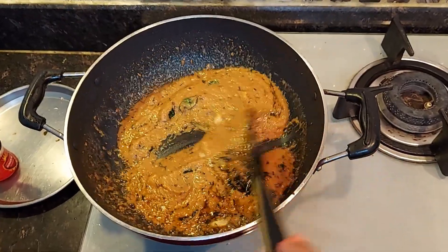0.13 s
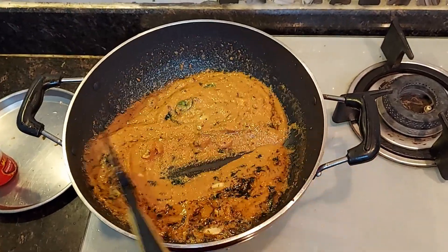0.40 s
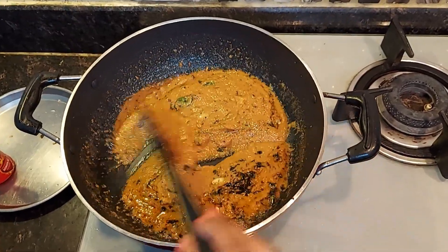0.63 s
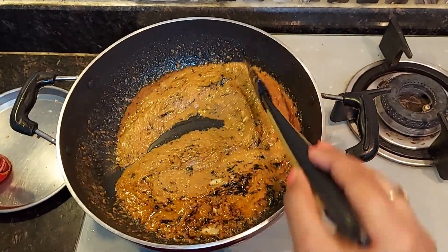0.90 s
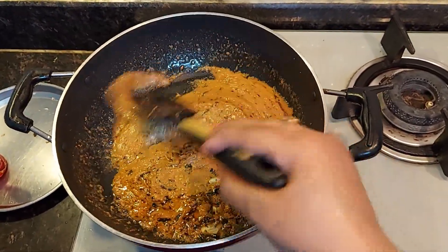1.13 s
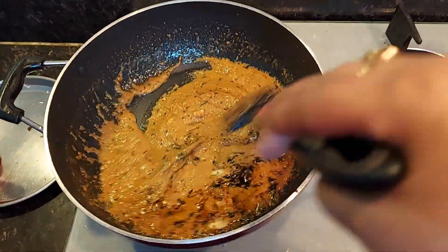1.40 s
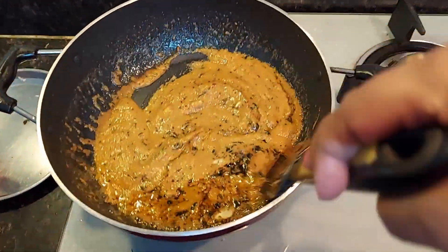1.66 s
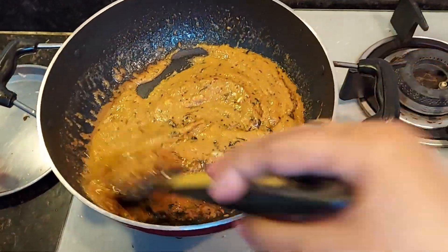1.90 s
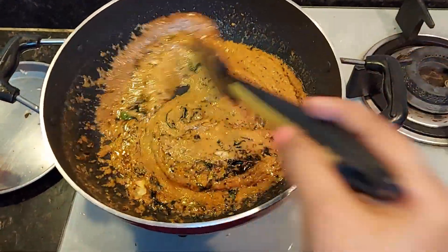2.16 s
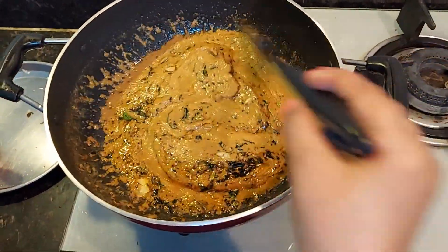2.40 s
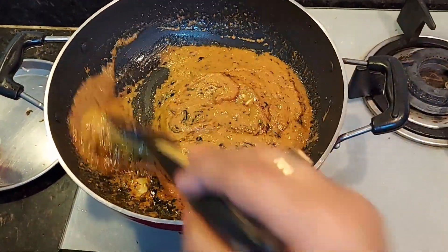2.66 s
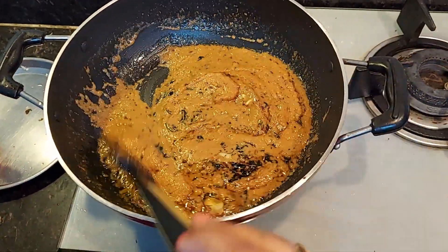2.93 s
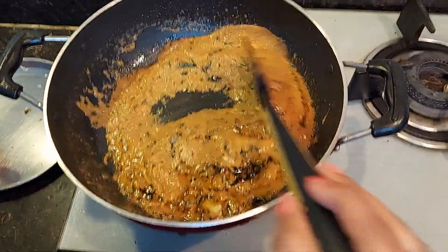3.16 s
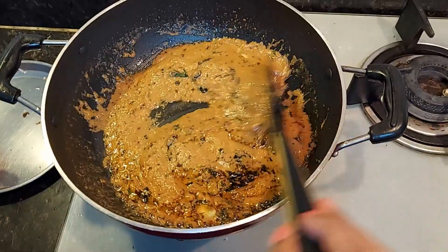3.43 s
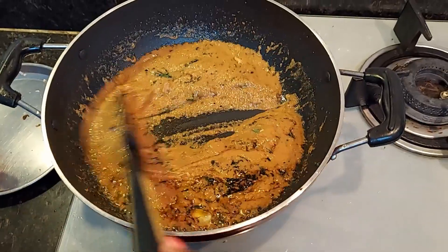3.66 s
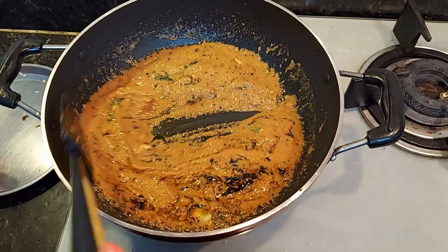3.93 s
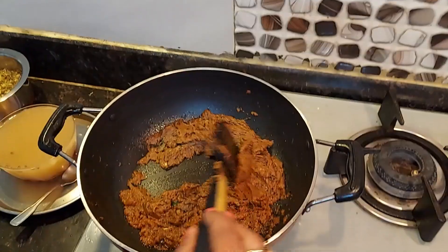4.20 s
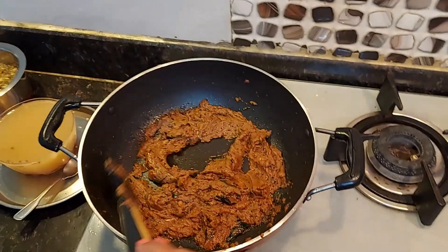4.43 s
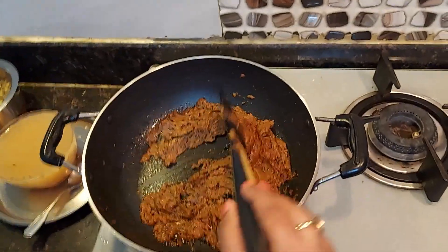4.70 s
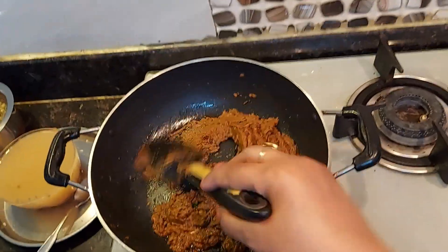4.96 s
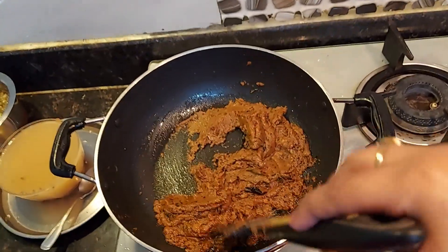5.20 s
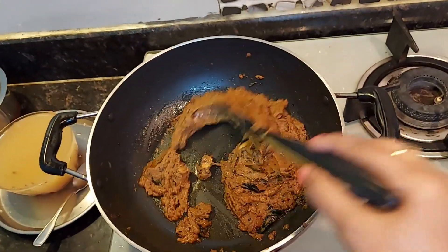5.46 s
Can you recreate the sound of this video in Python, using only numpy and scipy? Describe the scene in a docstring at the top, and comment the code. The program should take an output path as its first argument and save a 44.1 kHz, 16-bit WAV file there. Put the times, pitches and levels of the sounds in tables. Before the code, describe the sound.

In a home kitchen, heard from very near, paste fries with a steady dense hiss of tiny bursting bubbles, bright snaps mostly toward the left, and bubbly blips around one second. Stirring adds low rubbing and irregular woody-metallic pan bumps, weightier on the right. A brief silent edit follows, then fainter, drier frying with continued scraping and a strong cluster of knocks near five seconds.

```python
"""Kitchen, close over a deep pan on a gas ring: thick spice paste fries in oil while a spatula stirs it.
Two unlike microphone ports hear steam bubbles as dense filtered clicks, spits as short bright noise,
fat bubbles and bits of scrape as rough rising blips, mid-sized bubbles as brief rings of the bowl. The
blade drags as lumpy low noise and bumps the pan into a bank of decaying modes. After a short silent cut
the paste is drier, the sizzle softer and the microphones sit elsewhere."""
import sys
import numpy as np
from scipy import signal
from scipy.fft import rfft, irfft
from scipy.io import wavfile

SR = 44100
rng = np.random.default_rng(int(sys.argv[2]) if len(sys.argv) > 2 else 0)


def digitize_waveform(pressure):
    """Quantize a signal to 16-bit integers and store it at the path in sys.argv[1].

    Rows of a 2-D input are taken as channels; values are limited to [-1, 1].
    """
    field = np.atleast_2d(pressure).T
    bounded = np.clip(field, -1, 1)
    quanta = np.round(bounded * 32767).astype(np.int16)
    wavfile.write(sys.argv[1], SR, quanta)


def invert_db(level):
    """Linear amplitude ratio for a level in decibels (20 dB per decade), elementwise."""
    return 10 ** (np.asarray(level, dtype=float) / 20)


N = 246078
CUT_S = 4.18
PORT_LAG_S = 0.0003   # right port after left


def rms_one(x):
    """Scale to unit power."""
    return x / np.sqrt(np.mean(x ** 2) + 1e-20)


def in_time(rows):
    """Columns of a table as curves over all samples."""
    s, *columns = np.transpose(rows)
    return [np.interp(np.arange(N) / SR, s, c) for c in columns]


def drift(rate_per_s):
    """Slow chance with spread 1: twice-smoothed noise made at 1/40 of the sample rate."""
    r = np.exp(-80 * np.pi * rate_per_s / SR)
    noise = rng.standard_normal(N // 40 + 2002)
    slow = rms_one(signal.lfilter([1], [1, -2 * r, r * r], noise)[2000:])
    return np.interp(np.arange(N) / 40, np.arange(len(slow)), slow)


def colour(x, points, size=4096):
    """Causal (minimum phase) filter with the given spectrum."""
    hz, level_db = np.transpose(points)
    grid_hz = np.maximum(np.arange(size // 2 + 1), 0.1) * SR / size
    log_gain = np.log(invert_db(np.interp(np.log(grid_hz), np.log(hz), level_db)))
    cepstrum = irfft(log_gain)
    cepstrum[1:size // 2] *= 2
    cepstrum[size // 2 + 1:] = 0
    impulse = irfft(np.exp(rfft(cepstrum)))
    return signal.oaconvolve(x, impulse)[:N]


def band(x, low_hz, high_hz):
    """Fourth-order band-pass."""
    return signal.sosfilt(signal.butter(4, [low_hz, high_hz], "band", fs=SR, output="sos"), x)


def one_side(x, edge_hz, side):
    """Second-order low-pass or high-pass."""
    return signal.sosfilt(signal.butter(2, edge_hz, side, fs=SR, output="sos"), x)


def lean(left_over_right_db):
    """Gains of the two ports for a level difference."""
    return invert_db(left_over_right_db * np.array([[0.5], [-0.5]]))


def delayed(x, lag_s):
    """Later by lag_s, same length."""
    return np.r_[np.zeros(round(lag_s * SR)), x][:N]


def add_event(out, start_s, pair):
    """Add a two-port event, the right port late by the lag."""
    i, lag, size = round(start_s * SR), round(PORT_LAG_S * SR), pair.shape[1]
    out[0, i:i + size] += pair[0]
    out[1, i + lag:i + lag + size] += pair[1]


# spectrum of the kitchen air: pitch_hz, level_db_per_hz (relative)
AIR_SPECTRUM = [(20, -28.5), (45, -5), (90, 2.5), (200, -14), (500, -15), (1000, -15.5), (2000, -35)]


def kitchen_air():
    """A dull steady murmur of flame and room: shaped noise, unrelated at the two ports."""
    level_db = -60.5
    return invert_db(level_db) * np.array([rms_one(colour(n, AIR_SPECTRUM)) for n in rng.standard_normal((2, N))])


# blade dragging, before and after the cut: time_s, level_db, scrape_gain_db (above 250 Hz)
BLADE_DRAG = [
    [(0.0, -56.5, 0), (0.3, -51.5, -4), (0.45, -56, -1), (0.8, -55.5, -1), (1.07, -64, 2), (1.24, -53, 0),
     (1.42, -58.5, -7), (1.6, -58.5, 0), (1.9, -58.5, -2), (2.15, -56, -1), (2.45, -55.5, -8),
     (2.74, -57, -6), (3.15, -57, 2.5), (3.4, -57, -3), (3.65, -50.5, -14), (3.87, -60.5, -8),
     (4.12, -52.5, -7)],
    [(4.26, -65, 9), (4.4, -56, -1), (4.55, -59, 2), (4.722, -53.5, -5), (4.9, -55, 1), (5.076, -56.5, 2),
     (5.25, -58, 1.5), (5.4, -57, 4), (5.58, -59, 5)],
]
# spectrum of the drag: pitch_hz, level_db_per_hz (relative)
DRAG_SPECTRUM = [(25, -58), (45, -8.5), (72, -2.5), (86, -4.5), (99, 5.5), (113, -8.5), (128, -6),
                 (150, -4), (200, -15), (280, -9), (450, -14.5), (600, -24.5), (900, -25.5)]


def blade_drag():
    """The blade shakes the pan in uneven lumps and scrapes unevenly too; partly unlike at the ports."""
    lump_db, lump_per_s = 2.2, 19.0
    scrape_lump_db, scrape_lump_per_s = 2.4, 10.3
    unlike_db = -4   # each port's own noise over the shared noise
    level_db, scrape_db = in_time(np.vstack(BLADE_DRAG))
    shared, left, right = (rms_one(colour(n, DRAG_SPECTRUM)) for n in rng.standard_normal((3, N)))
    shake = shared + invert_db(unlike_db) * np.array([left, right])
    scrape = one_side(shake, 250, "high")
    level = invert_db(level_db + lump_db * drift(lump_per_s))
    scrape_gain = invert_db(scrape_db + scrape_lump_db * drift(scrape_lump_per_s))
    return level * (shake + (scrape_gain - 1) * scrape)


# blade bumps: start_s, boom_db, second_modes_db, upper_modes_db, press_ms (8 ms at least)
BLADE_BUMPS = [(0.101, -50, -44, -42, 20), (0.117, -34.5, -37, -43, 33), (0.161, -48, -35, -44.5, 19),
               (0.53, -39, -59, -66, 31), (0.655, -32.5, -32.5, -44, 41), (0.729, -38, -40.5, -49, 25),
               (1.042, -23, -26, -41.5, 61), (1.045, -60, -35, -27.5, 7), (1.084, -60, -41, -43, 20),
               (1.108, -60, -47, -34.5, 10), (1.118, -29, -31.5, -42, 34), (1.165, -42, -31.5, -49, 34),
               (1.2, -51, -40, -53, 28), (1.31, -42, -70, -63, 16), (1.419, -43, -73, -72, 43),
               (1.658, -43, -40.5, -48.5, 103), (1.711, -45, -32, -55, 49), (1.751, -48, -31, -55, 32),
               (1.843, -31.5, -41.5, -49, 23), (2.55, -33, -35.5, -58, 24), (2.612, -40, -47, -70, 21),
               (2.659, -42, -50, -62, 18), (2.722, -45.5, -41.5, -63, 40), (2.921, -39, -23, -34.5, 34),
               (2.935, -60, -50, -50, 18), (2.946, -27.5, -25, -47, 34), (2.961, -60, -50, -36, 6.9),
               (2.979, -35, -29.5, -45.5, 38), (3.031, -41, -32.5, -53, 22), (3.08, -46, -42, -58, 20),
               (3.33, -48, -53, -64, 11), (3.51, -32.5, -32.5, -41, 33), (3.62, -51, -36.5, -45, 20),
               (3.674, -59, -52, -44, 9.3), (3.923, -45, -57, -53, 160), (4.013, -42, -35, -34.5, 7.9),
               (4.022, -60, -45, -38, 7), (4.034, -55, -36, -51, 74), (4.228, -37.5, -80, -54.5, 98),
               (4.334, -45, -46.5, -69, 50), (4.603, -43, -41, -56, 100), (4.662, -40, -51, -58, 29),
               (4.756, -37, -36.5, -44, 30), (4.804, -38, -50, -64, 39), (4.865, -40, -60, -60, 86),
               (4.938, -28, -26.5, -41.5, 25), (4.966, -21, -22, -46, 28), (5.011, -30, -31, -45, 29),
               (5.064, -50, -36, -58, 43), (5.19, -44.5, -60, -66, 140), (5.314, -37, -45, -46.5, 20),
               (5.356, -38, -27, -50, 55), (5.394, -53, -32.5, -55, 22), (5.429, -60, -42, -58, 41),
               (5.449, -54, -35.5, -61, 114)]
# bumps where the blade's hard edge meets bare metal: start_s, top_modes_db
HARD_EDGE = [(2.92, -43), (2.935, -40), (2.946, -43)]
# where the blade lands sets which modes answer most: start_s, second_centre_hz, upper_centre_hz
BLADE_LANDINGS = [(0.117, 162, 280), (0.655, 196, 510), (1.044, 189, 806), (1.084, 190, 780),
                  (1.108, 190, 770), (1.118, 174, 480), (1.166, 163, 350), (1.71, 149, 300),
                  (1.751, 150, 300), (2.92, 192, 382), (2.946, 180, 370), (2.98, 161, 350),
                  (2.963, 170, 815), (3.511, 202, 310), (3.675, 170, 805), (4.014, 191, 770),
                  (4.023, 189, 700), (4.034, 191, 550), (4.755, 191, 456), (4.938, 208, 550),
                  (4.965, 191, 480), (5.011, 190, 480), (5.065, 190, 300), (5.356, 150, 300),
                  (5.395, 150, 300), (5.43, 160, 300), (5.45, 240, 298)]
# modes of the pan on its trivet: pitch_hz, level_db (in its family), t60_s
PAN_MODES = [(91.4, -4, 0.051), (151.8, -6.5, 0.29), (191, -9, 0.18), (236.8, -14, 0.11), (265.3, -6, 0.21),
             (316, -11, 0.041), (356.7, -7, 0.077), (456, -10, 0.11), (527.7, -10.5, 0.29),
             (633, -13.5, 0.089), (742, -10.5, 0.1), (831, -8, 0.025), (950, -12, 0.025), (1135, -3, 0.07),
             (1237, -9, 0.05), (2130, 3, .05), (2480, 0, .025)]
# borders between boom, second, upper and top modes: pitch_hz
FAMILY_BORDERS = [120, 247, 1050]
# motion of each family: swell_share_of_press, droop_over_press_db, chatter_db
FAMILY_MOTION = [(0.9, -0.5, 0.3), (0.6, -8.5, -1.4), (0.22, -7, 3.5), (0.15, -7.5, 6)]


def blade_bumps(size=9000, slip_count=31):
    """Modes swell while the blade presses, then die in the paste; upper modes answer sooner and chatter."""
    landing_gain_db, landing_db_per_octave = 3.5, (0, 19.5, 9)   # slopes: boom, second, upper
    slip_s, strength_share = 0.0078, 0.5   # strength: one chance draw per mode and bump
    detune_share, dry_boom_rise_share = 0.023, 0.059   # less paste weighs on the pan after the cut
    droop_curve, port_phase_rad = 0.82, 1.03
    t = np.arange(size) / SR
    slip_times = np.arange(slip_count) * slip_s
    out = np.zeros((2, N + size))
    draws = rng.standard_normal((len(BLADE_BUMPS), len(PAN_MODES), 4 + slip_count))
    for (start_s, *family_db, press_ms), draw in zip(BLADE_BUMPS, draws):
        family_db += [db for at, db in HARD_EDGE if abs(at - start_s) < 0.004]
        centres = [(None, *hz, None) for at, *hz in BLADE_LANDINGS if abs(at - start_s) < 0.006]
        press_s = max(press_ms, 8) / 1000
        released_s = np.maximum(t - press_s, 0)
        pressed_share = np.minimum(t / press_s, 1)
        i = round(start_s * SR)
        for (hz, level_db, t60_s), (phase, detune, strength, apart, *slips) in zip(PAN_MODES, draw):
            family = np.searchsorted(FAMILY_BORDERS, hz)
            if family == len(family_db):   # no hard edge: top modes stay silent
                break
            swell_share, droop_db, chatter_db = FAMILY_MOTION[family]
            if centres and centres[0][family]:
                octaves = abs(np.log2(hz / centres[0][family]))
                level_db = level_db + landing_gain_db - landing_db_per_octave[family] * octaves
            swell_s = max(swell_share, 0.02) * press_s
            shape = np.sin(np.pi / 2 * np.minimum(t / swell_s, 1)) ** 0.44
            shape *= invert_db(droop_db * pressed_share ** droop_curve - 60 * released_s / t60_s)
            shape *= invert_db(chatter_db * (strength_share * strength + np.interp(t, slip_times, slips)))
            dry_boom = family == 0 and start_s > CUT_S
            pitch_hz = hz * (1 + detune_share * detune + dry_boom_rise_share * dry_boom)
            port_phase = port_phase_rad * (family > 1) * apart * np.array([[0], [1]])
            tone = np.sin(2 * np.pi * pitch_hz * t + 4 * phase + port_phase)
            out[:, i:i + size] += invert_db(family_db[family] + level_db) * shape * tone
    return out[:, :N]


# short rough blips near 1-2.5 kHz, fat bubbles and bits of scrape: start_s, level_db, pitch_hz
ROUGH_BLIPS = [(0.3398, -31, 1310), (0.4944, -50, 1190), (0.8225, -36, 2000), (0.8805, -36, 2040),
               (0.898, -30.5, 2000), (0.9263, -29, 1880), (0.9931, -36, 2120), (1.129, -37, 1940),
               (1.181, -33, 2160), (1.251, -29, 2140), (1.274, -31, 2190), (1.286, -29, 2120),
               (1.303, -35, 2140), (1.433, -36, 2000), (1.5795, -33, 2100), (2.1051, -49, 1190),
               (3.677, -41, 2000), (4.3675, -43, 2430), (4.5095, -44, 2020), (4.574, -39.5, 1710),
               (5.01, -42, 1260), (5.022, -46, 2040)]


def rough_blips(size=700):
    """Fat bubbles and bits of scrape: a few milliseconds of tone, rough and slightly rising."""
    pan_db, pan_spread_db = -7, -2.5   # left over right
    attack_s, decay_s, trim_db = 0.00048, 0.006, -3.0
    t = np.arange(size) / SR
    out = np.zeros((2, N + 2 * size))
    draws = rng.standard_normal((len(ROUGH_BLIPS), size + 1))
    for (start_s, level_db, hz), (side, *noise) in zip(ROUGH_BLIPS, draws):
        tone = np.sin(2 * np.pi * hz * t * (0.96 + 8.4 * t))
        rough = 0.37 * rms_one(band(noise, 0.25 * hz, 1.53 * hz))
        shape = np.minimum(t / attack_s, 1) * np.exp(-(t / decay_s) ** 2)
        blip = invert_db(level_db + trim_db) * (tone + rough) * shape
        add_event(out, start_s, blip * lean(pan_db + pan_spread_db * side))
    return out[:, :N]


# resonances of the pan's bowl: pitch_hz, level_db (relative), t60_s
BOWL_MODES = [(860, -8.5, 0.041), (1130, -5.5, .04), (1296, -7, 0.031), (1480, -8, .025),
              (1790, -2.5, 0.022), (2160, -5, 0.042), (2320, -7, 0.031), (2540, -0.5, 0.041),
              (3000, -1, 0.029), (3660, -1.5, 0.011), (3940, -4, 0.016), (4110, -11, 0.019),
              (4870, 0, .012)]


def crackle():
    """Mid-sized bubbles burst unevenly; each sets one resonance of the bowl ringing briefly."""
    base_per_s, clump_db, clump_per_s = 600, 4, 25
    spread_db, spread_cap = 4, 2.6
    over_treble_db, pan_db = -10.5, -3
    treble_db, lower_db, _ = in_time(np.vstack(SIZZLE_VIGOUR))
    born = rng.random(N) < base_per_s * invert_db(clump_db * drift(clump_per_s)) / SR
    sizes = invert_db(spread_db * np.minimum(rng.exponential(1, N), spread_cap))
    clicks = born * sizes * rng.choice([-1, 1], N)
    dealt = rng.integers(0, len(BOWL_MODES), N)
    rings = np.zeros(N)
    for k, (hz, level_db, t60_s) in enumerate(BOWL_MODES):
        r, w = invert_db(-60 / (t60_s * SR)), 2 * np.pi * hz / SR
        mine = clicks * (dealt == k) + 1e-18
        rings += invert_db(level_db) * signal.lfilter([0, np.sin(w)], [1, -2 * r * np.cos(w), r * r], mine)
    level_db = treble_db + lower_db - lower_db.mean() + over_treble_db
    heard = invert_db(level_db) * rms_one(rings)
    return np.array([heard, delayed(heard, PORT_LAG_S)]) * lean(pan_db)


def small_spits(count=90):
    """Spits at evenly random moments; their loudness follows the sizzle's level. Rows as in SET_SPITS."""
    over_treble_db, spread_db, low_hz, high_hz = 3.5, 2.5, 2300, 16000
    pan_db, pan_spread_db = 16.5, 6.4   # left over right
    when, size, pitch = rng.random((count, 3)).T
    treble_db = in_time(np.vstack(SIZZLE_VIGOUR))[0][(when * N).astype(int)]
    level_db = treble_db + over_treble_db + spread_db * (2 * size - 1)
    side_db = pan_db + pan_spread_db * rng.standard_normal(count)
    pitch_hz = low_hz * (high_hz / low_hz) ** pitch
    return np.transpose([when * N / SR, level_db, side_db, pitch_hz])


# single spits at set times, most of them loud: start_s, level_db, left_over_right_db, pitch_hz
SET_SPITS = [(0.0169, -29.5, 21, 7800), (0.3401, -30, -3, 8900), (0.348, -30, -4, 6000),
             (0.4964, -28, 1, 7000), (0.5831, -31, 2, 11500), (0.6845, -41, 9, 8000),
             (0.9258, -32, 7, 11400), (0.9892, -27, 3, 11700), (1.1273, -30, 15, 9400),
             (1.181, -34, 19, 4030), (1.2174, -29, 7, 7600), (1.2675, -32, 9, 4040), (1.3009, -33, 9, 7340),
             (1.3852, -31.5, 7, 3700), (1.4642, -43, 8, 8000), (1.5788, -29, 3, 12100),
             (1.642, -25.5, 4, 11400), (1.713, -28, 12, 8900), (1.9969, -35, 2, 3400),
             (2.0395, -34, 0, 3600), (2.0625, -31, -3, 2400), (2.1111, -25.5, 4, 3500),
             (2.2238, -28, 8, 11100), (2.3846, -29, 5, 11000), (2.503, -30, 8, 12000),
             (2.843, -29.5, 5, 7300), (3.1193, -35, 7, 11800), (3.1667, -27.5, -1, 3020),
             (3.2171, -33, -6, 3820), (3.3239, -45, 1, 8000), (3.5836, -30, 3, 5490),
             (3.6646, -35, 5, 3970), (3.7983, -26.5, 5, 11800), (3.9205, -27.5, 3, 3500),
             (3.9487, -30.5, 5, 3180), (4.0986, -20, 5.5, 9500), (5.2548, -40, 9, 7000),
             (5.4036, -38, -1, 7500)]


def spits(size=600):
    """A bursting bubble: a millisecond of bright noise ringing near its pitch, a weaker spatter behind."""
    peak_s, shortest_s, ring_cycles = 0.001, 0.00022, 2.2   # lower spits last longer
    spatter_db, spatter_s, trim_db = -12, 0.005, 5.5
    t = np.arange(size) / SR
    out = np.zeros((2, N + 700))
    rows = np.vstack([SET_SPITS, small_spits()])
    spatter = invert_db(spatter_db) * np.minimum(t / peak_s, 1) * np.exp(-t / spatter_s)
    for (start_s, level_db, pan_db, hz), noise in zip(rows, rng.standard_normal((len(rows), 2, size))):
        decay_s = max(ring_cycles / hz, shortest_s)
        burst = np.exp(-np.abs(t - peak_s) / np.where(t < peak_s, shortest_s, decay_s))
        ringing = band(noise, 0.7 * hz, min(1.3 * hz, 17000))
        crack = (0.9 * noise + 1.3 * ringing) * (burst + spatter)
        crack = np.array([colour(c, p)[:size] for c, p in zip(crack, (LEFT_WET_COLOUR, RIGHT_WET_COLOUR))])
        crack /= np.abs(crack).max(1, keepdims=True)
        add_event(out, start_s, crack * invert_db(level_db + trim_db) * lean(pan_db))
    return out[:, :N]


def wall_echoes(x, lags, gain):
    """Short echoes off the pan wall smear a click to a millisecond and leave its spectrum flat."""
    for lag in lags:
        taps = np.r_[1, np.zeros(lag - 1), -gain]
        x = signal.lfilter(taps[::-1], taps, x + 1e-18)
    return x


def bursts(spot_count=6):
    """Bubbles burst in clumps all over the pan; each reaches the right port with a lag of its own."""
    base_per_s, clump_db, spread_db, spread_cap = 9000, 1.2, 2.8, 6.0
    lag_spread_s = 0.00014
    dice = rng.random(N)
    at = np.flatnonzero(dice < base_per_s * invert_db(clump_db * (drift(40) + drift(150))) / SR)
    sizes = invert_db(spread_db * np.minimum(rng.exponential(1, N), spread_cap))[at]
    sizes *= rng.choice([-1, 1], N)[at]
    lag_s = PORT_LAG_S + lag_spread_s * rng.standard_normal(N)[at]
    late = np.clip(at + (SR * lag_s).astype(int), 0, N - 1)
    spot = rng.integers(0, spot_count, N)[at]
    out = np.zeros((2, N))
    for k in range(spot_count):
        here = spot == k
        clicks = np.array([np.bincount(when[here], sizes[here], N) for when in (at, late)])
        out += wall_echoes(clicks, rng.integers(3, 24, 2), gain=0.55)
    return out


# sizzle, wet then dry paste: time_s, treble_db, lower_hiss_db, top_hiss_db (hisses about their mean)
SIZZLE_VIGOUR = [
    [(0.03, -41, -6.5, 1), (0.25, -43.5, -4.5, 1.5), (0.35, -42.5, -4.5, 1), (0.43, -42, -4, -5),
     (0.455, -44, -4.5, 5), (0.49, -42, -3.5, 0), (0.535, -44, -6.5, -2), (0.68, -45, -5.5, 4),
     (0.86, -42, -8.5, -0.5), (0.9, -44.5, -3.5, -1), (0.95, -44, -5, 0), (1.23, -44, -2.5, -0.5),
     (1.26, -41, -6.5, -2), (1.31, -43, -5.5, -2), (1.41, -44, -4.5, -1.5), (1.74, -43, -7, 3.5),
     (1.83, -45, -6, 0), (1.97, -43.5, -2.5, 2), (2.05, -41.5, -2, -12.5), (2.12, -41.5, -5, 1.5),
     (2.16, -44, -4.5, 2.5), (2.3, -41.5, -8.5, 2), (2.62, -39.5, -4.5, 2), (2.73, -43.5, -5.5, 0.5),
     (2.88, -40.5, -7, 1), (2.99, -41.5, -5, 1.5), (3.13, -42.5, -4, 0.5), (3.2, -45, -5, 1),
     (3.225, -41.5, -1.5, -2), (3.31, -45.5, -6, -2), (3.39, -44.5, -5.5, 1.5), (3.77, -44.5, -4.5, -2.5),
     (3.81, -44, -6, 1), (3.89, -46.5, -5.5, 2), (3.95, -43, -3.5, -2), (4.06, -48, -3.5, 0),
     (4.12, -44.5, -5.5, 2)],
    [(4.27, -55.5, -4.5, -2), (4.312, -52, -6, -4), (4.45, -53, -3, -19), (4.58, -52, -6.5, 2),
     (4.63, -48, -11, -6), (4.68, -51, -6.5, 2), (4.75, -51, -5.5, -1), (4.932, -57, -5, 3),
     (5.0, -49.5, 0, 0), (5.11, -49, -4.5, 2), (5.174, -56, -4, -1), (5.35, -52, -5, 0),
     (5.41, -50.5, -6, 0), (5.48, -49.5, -4.5, -4), (5.53, -48, -6, 1), (5.57, -48.5, -6.5, -1)],
]
# colour of the sizzle at each port, wet then dry paste: pitch_hz, level_db_per_hz (relative)
LEFT_WET_COLOUR = [(300, -6), (500, -15.5), (750, 1.5), (1000, -6.5), (1300, 4.5), (1800, 1.5),
                   (2300, -0.5), (2750, -2.5), (3100, 1.5), (4500, 1), (6300, -1), (7300, 5), (8200, 2),
                   (9800, 2), (16000, 3.5)]
RIGHT_WET_COLOUR = [(300, -21.5), (830, 2), (1050, -3), (1450, 6), (1700, -1), (1900, 9), (2500, 5.5),
                    (2750, -3), (3100, 1.5), (4000, 5), (5200, 0), (6100, -16), (7300, -30), (8300, -33),
                    (9300, -41), (10200, -3.5), (11400, 5), (13300, -1.5), (16000, 0)]
LEFT_DRY_COLOUR = [(300, 8), (700, 7), (1100, 2.5), (1800, 0.5), (2500, 0.5), (3600, -3.5), (5000, 2.5),
                   (6400, -1), (7200, 4.5), (9400, 2.5), (10500, 1), (16000, -2)]
RIGHT_DRY_COLOUR = [(300, 2.5), (700, 3.5), (1100, -0.5), (1400, 7), (2500, 4), (3700, 1.5), (4800, 4.5),
                    (6300, -2), (7400, 5), (9000, -2.5), (10700, -5.5), (13300, -0.5), (16000, 0)]


def sizzle():
    """The bursts take the colour of each port; the lower hiss swells and sinks slowly by chance."""
    flicker_db, flicker_per_s = 0.34, 8.1
    swell_db, swell_per_s = 1.5, 13
    wander_db, wander_per_s = 2, 9.4   # between the ports
    treble_db, lower_db, top_db = in_time(np.vstack(SIZZLE_VIGOUR))
    treble_db = treble_db + flicker_db * drift(flicker_per_s)
    lower_db = lower_db + swell_db * drift(swell_per_s)
    level = invert_db(treble_db) * lean(wander_db * drift(wander_per_s))
    wet = np.arange(N) < CUT_S * SR
    parts = ((wet, (LEFT_WET_COLOUR, RIGHT_WET_COLOUR)), (~wet, (LEFT_DRY_COLOUR, RIGHT_DRY_COLOUR)))
    clicks, out = bursts(), np.zeros((2, N))
    for part, colours in parts:
        heard = np.array([colour(c, points) for c, points in zip(clicks, colours)])
        heard /= np.std(band(heard.mean(0), 3000, 15500)[part])
        lower = one_side(heard, 3000, "low")
        top = one_side(heard, 9000, "high")
        lower_gain = invert_db(lower_db - lower_db[part].mean())
        top_gain = invert_db(top_db - top_db[part].mean())
        out += part * level * (heard + (lower_gain - 1) * lower + (top_gain - 1) * top)
    return out


def scene():
    """Low sounds are stronger at the right port; the bumps also reach it a little later."""
    boom_right_db, bass_right_db = 3.5, 10.5   # right over left
    knocks = blade_bumps()
    knocks[1] = delayed(knocks[1], PORT_LAG_S / 2)
    bass = blade_drag() + kitchen_air()
    low = knocks * lean(-boom_right_db) + bass * lean(-bass_right_db)
    return sizzle() + crackle() + spits() + rough_blips() + low


def band_limit(x):
    """A steep low-pass at the top of the band."""
    return signal.sosfilt(signal.butter(12, 17030, fs=SR, output="sos"), x)


def record(dry):
    """A quick fade to silence and back at the cut, then a steep top edge."""
    fade_out_s, fade_out_length_s = 4.132, 0.018
    fade_in_s, fade_in_length_s = 4.207, 0.037
    fade_power, top_hz = 3.0, 15720
    t = np.arange(N) / SR
    leaving = 1 - (t - fade_out_s) / fade_out_length_s
    returning = (t - fade_in_s) / fade_in_length_s
    faded = dry * np.clip(np.maximum(leaving, returning), 0, 1) ** fade_power
    top_edge = signal.ellip(10, 0.5, 60, top_hz, fs=SR, output="sos")
    mix = signal.sosfilt(top_edge, faded)
    return band_limit(mix)


dry = scene()
out = record(dry)
digitize_waveform(out)
```